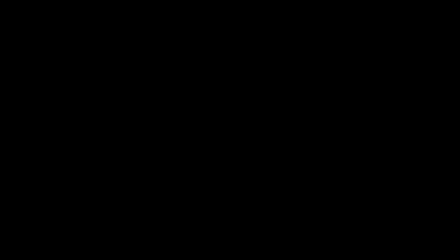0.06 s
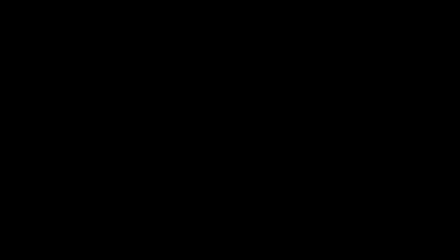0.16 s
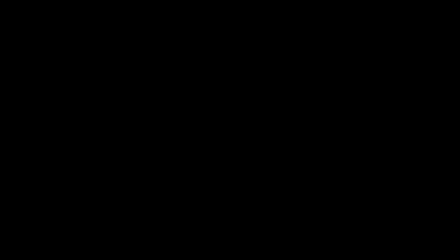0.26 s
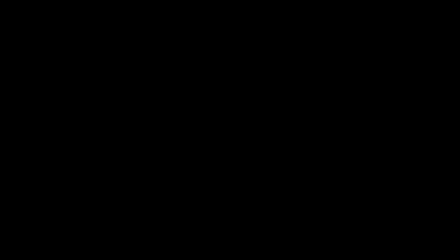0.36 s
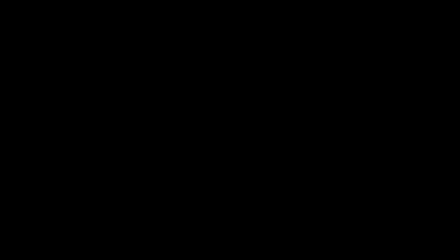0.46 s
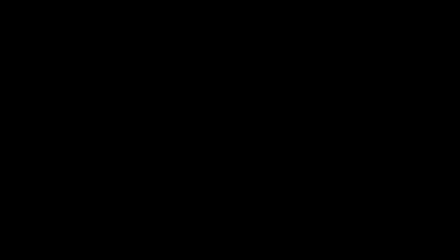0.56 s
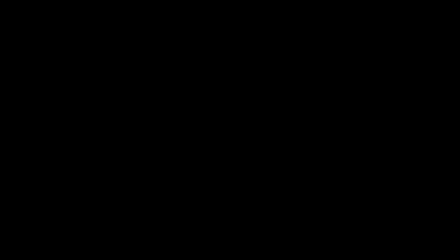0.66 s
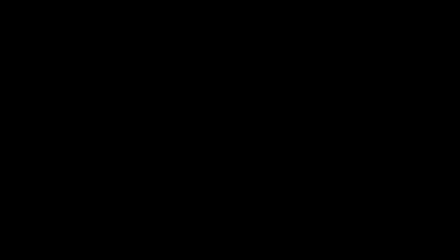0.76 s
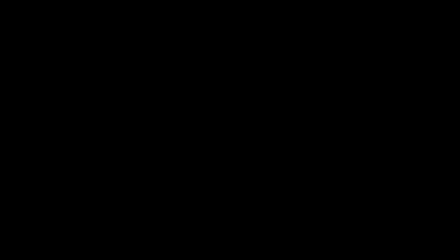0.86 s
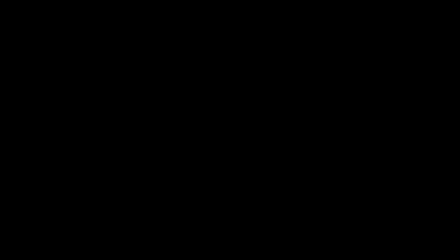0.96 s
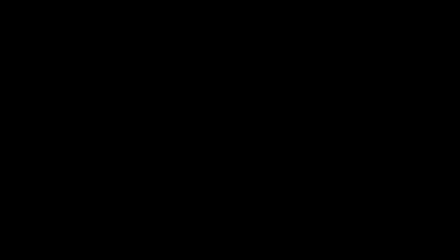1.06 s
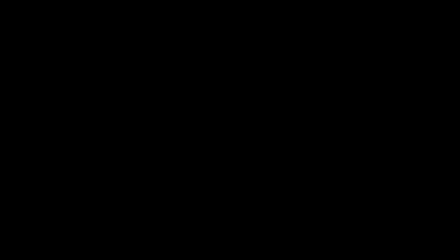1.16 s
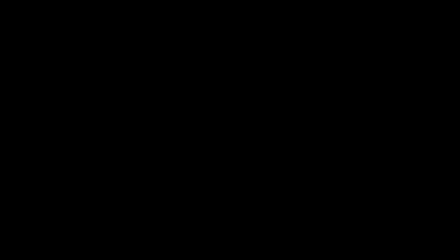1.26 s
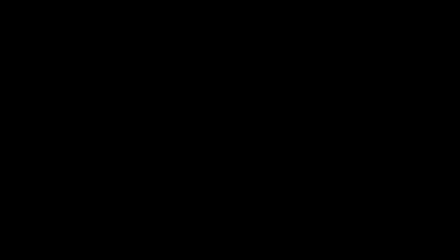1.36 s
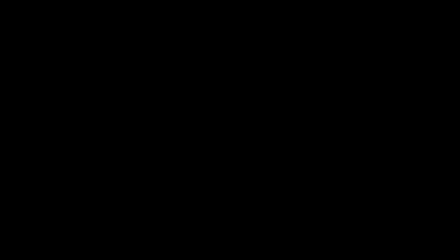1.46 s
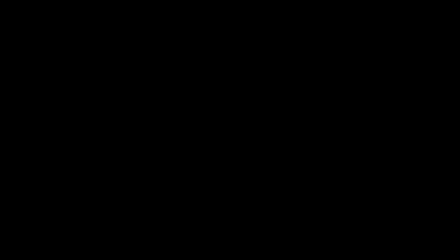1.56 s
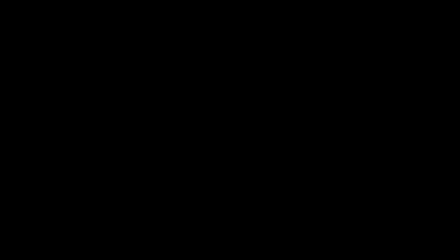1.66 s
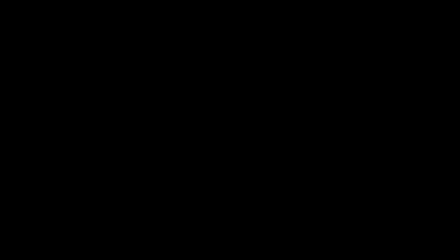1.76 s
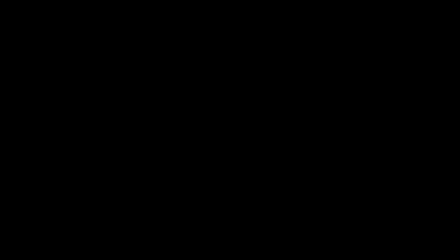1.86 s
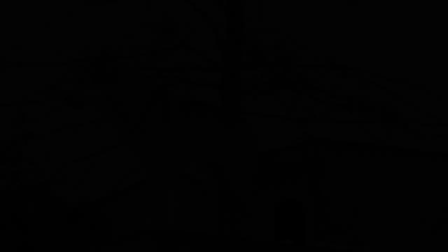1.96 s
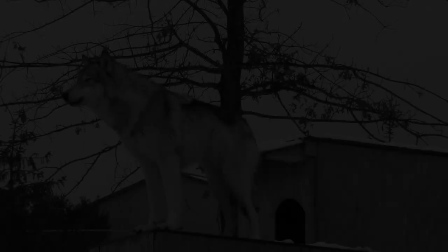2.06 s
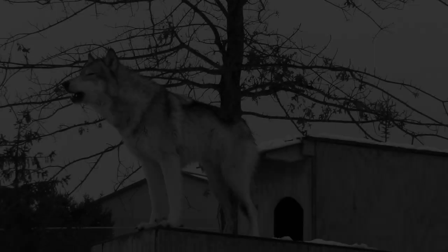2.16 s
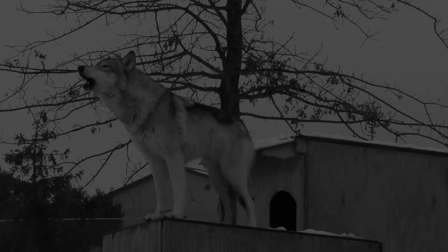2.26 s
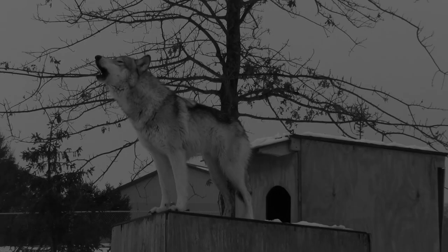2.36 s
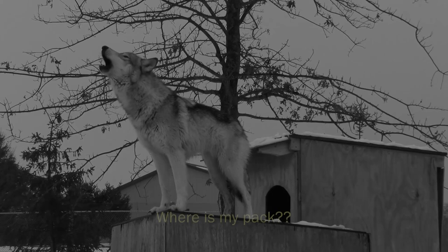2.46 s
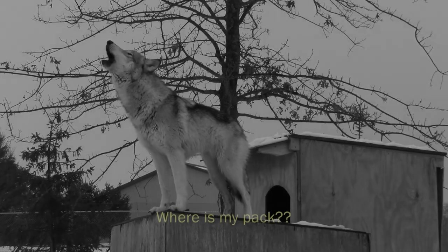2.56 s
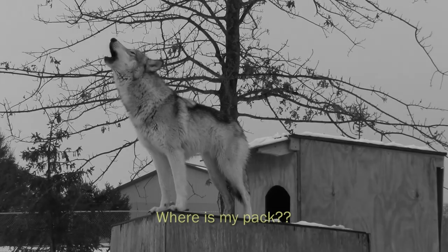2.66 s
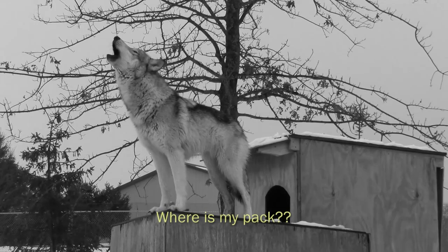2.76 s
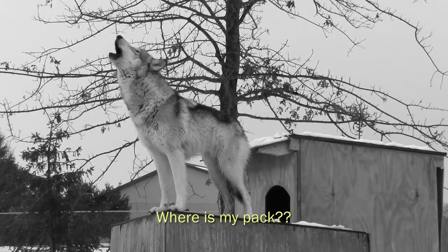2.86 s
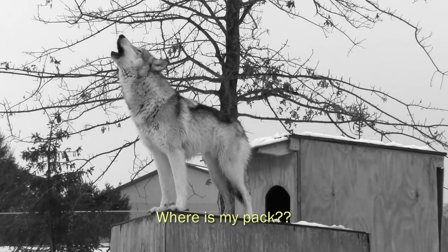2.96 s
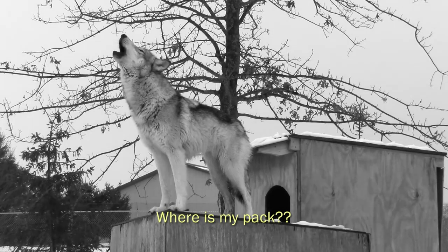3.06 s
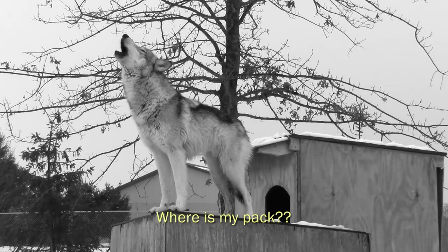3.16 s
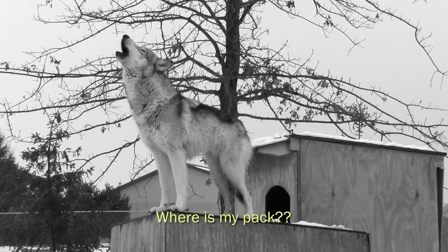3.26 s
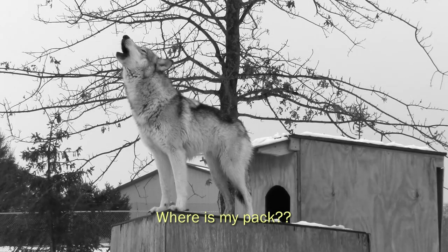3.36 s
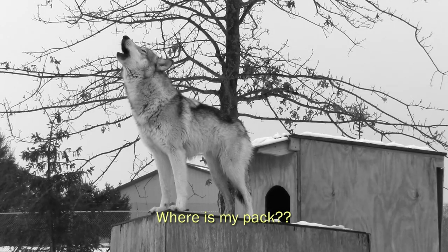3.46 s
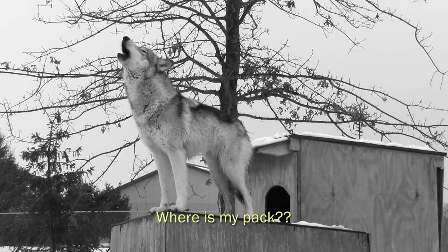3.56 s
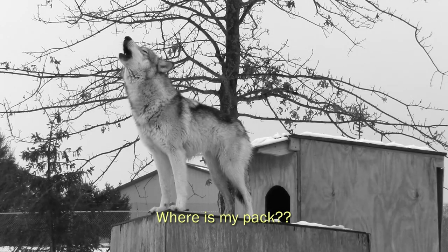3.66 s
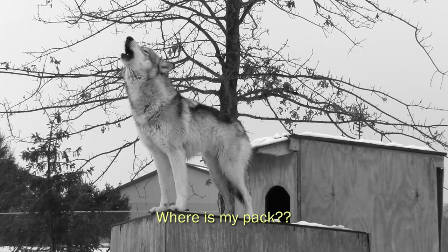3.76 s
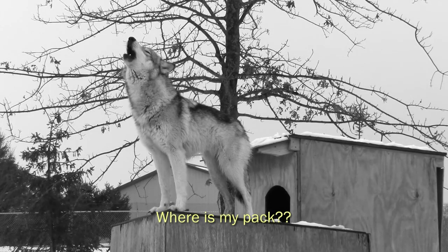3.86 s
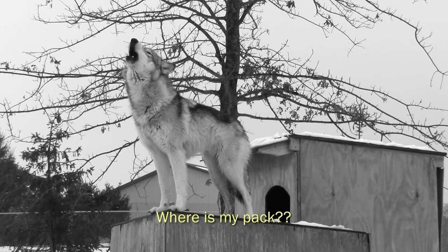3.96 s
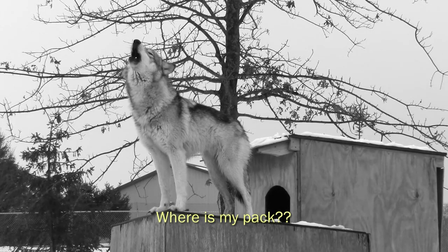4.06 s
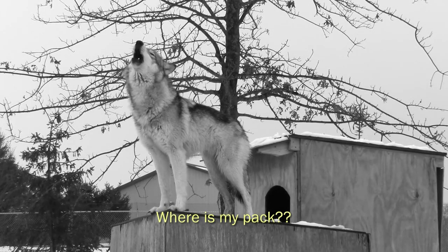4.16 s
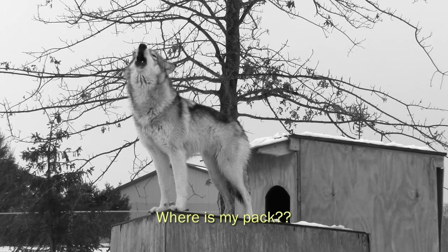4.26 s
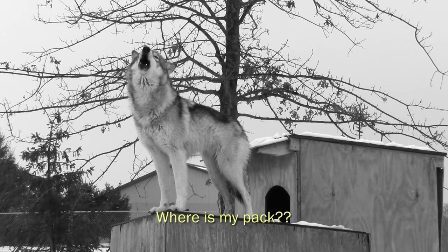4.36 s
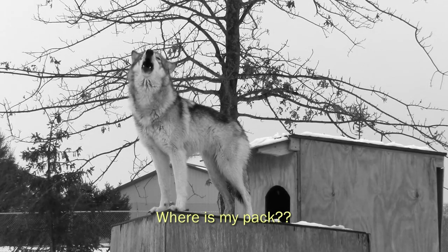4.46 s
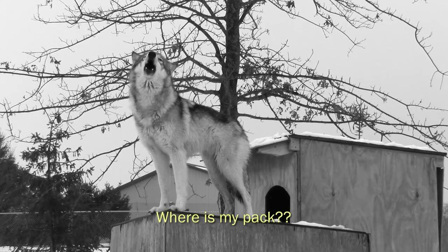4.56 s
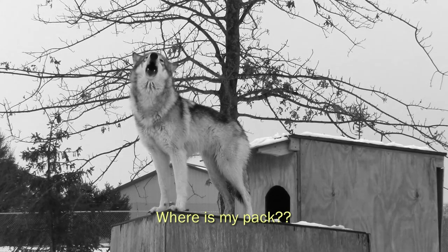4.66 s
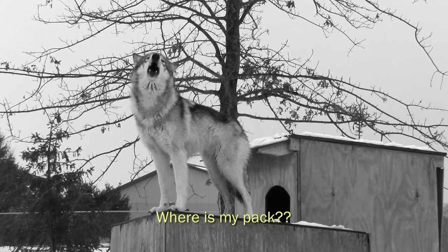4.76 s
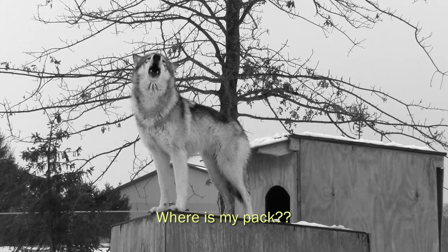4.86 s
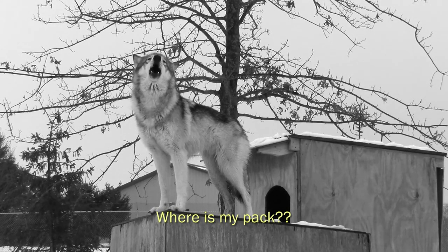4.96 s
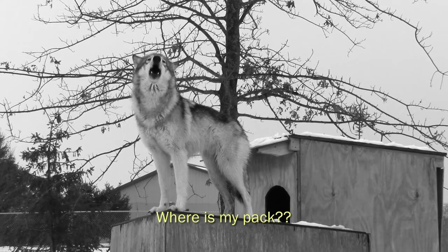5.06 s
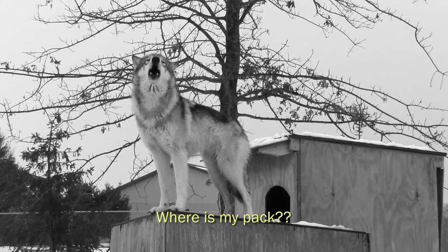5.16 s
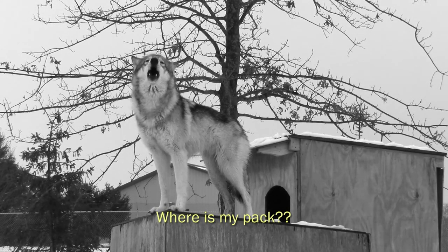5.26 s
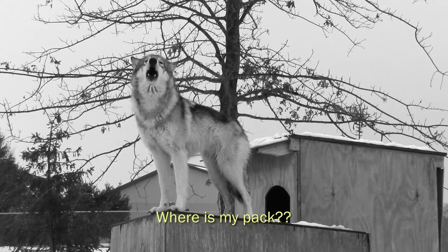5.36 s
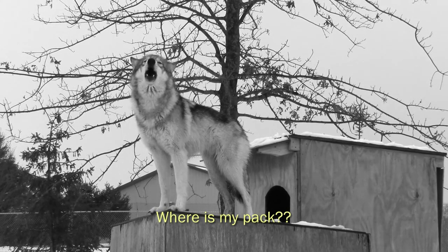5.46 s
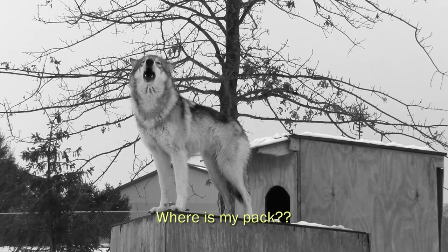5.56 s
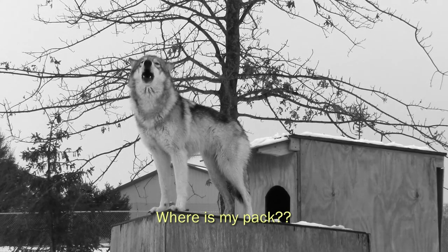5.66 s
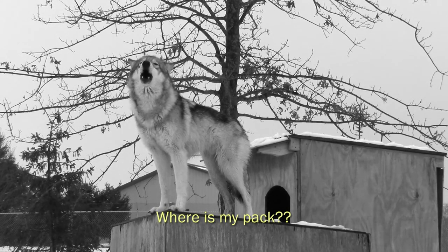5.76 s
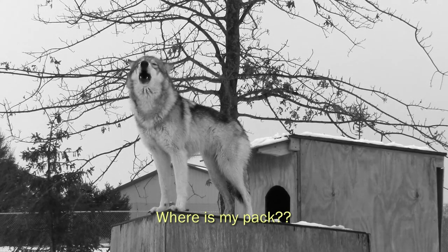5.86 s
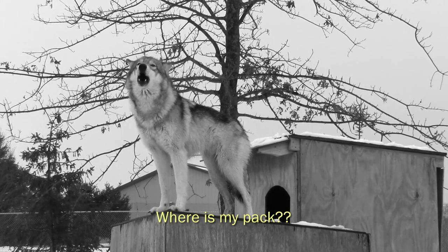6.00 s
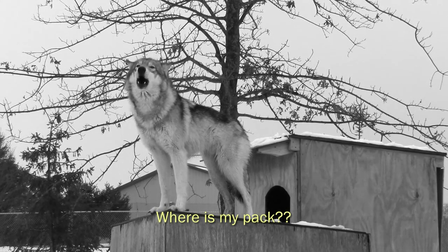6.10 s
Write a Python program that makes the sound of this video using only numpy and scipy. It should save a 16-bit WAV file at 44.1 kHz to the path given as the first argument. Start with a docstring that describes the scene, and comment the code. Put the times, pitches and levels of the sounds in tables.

```python
"""Shed roof: a wolf howls in nearly pure held notes that break in steps; summed partials on a trembling pitch.
Throat-filtered noise gives breath; a second, high oscillator gives a thin nasal whine.
Far wolves answer faintly on sinking partials; a bird chirps in bent sine whistles.
Claws tick on boards as damped sines, two dry rustles are gated noise, distant traffic hums as banded noise.
Loud peaks round off in the recorder."""
import sys
import numpy as np
from scipy import signal
from scipy.fft import rfft, irfft
from scipy.io import wavfile
from scipy.ndimage import uniform_filter1d

SR = 44100
rng = np.random.default_rng(int(sys.argv[2]) if len(sys.argv) > 2 else 0)


def pcm_store(signal):
    """Save signal as 16-bit PCM."""
    levels = np.round(np.clip(np.atleast_2d(signal), -1, 1) * 32767)
    wavfile.write(sys.argv[1], SR, levels.astype(np.int16).T)


N = 270333
T = np.arange(N) / SR

# howl, one table per register: (time [s], pitch [Hz], level [dB])
HOWL_NOTES = [
    [(0.02, 399.7, -19), (0.2, 399.5, -17.5), (0.3, 406, -17.5), (0.41, 410.8, -18.5), (0.428, 412.4, -19),
     (0.436, 423, -20.5)],
    [(.443, 518.6, -33.5), (.563, 531.3, -34.5), (.775, 519.7, -37), (.9, 492.6, -37), (.969, 452, -31),
     (1.0, 426, -29), (1.015, 382, -25.5), (1.04, 369.5, -27.5), (1.093, 352.6, -37), (1.139, 328.7, -45.5),
     (1.25, 316, -51.5), (1.3, 311, -71)],
    [(2.288, 507, -41), (2.295, 487, -25.5), (2.305, 437, -19.8), (2.32, 448.5, -16.5), (2.335, 457, -17),
     (2.348, 470, -16.5), (2.354, 464, -23.5)],
    [(2.357, 635, -25), (2.373, 622, -24.5), (2.398, 663, -29), (2.408, 746, -30.5)],
    [(2.412, 810, -32), (2.43, 864, -25.5), (2.449, 890, -26), (2.465, 900, -25.5), (2.488, 908, -43),
     (2.52, 940, -73)],
    [(2.925, 947, -41), (2.935, 920, -31), (2.95, 935, -24), (3.03, 904, -23), (3.2, 882, -22.5),
     (3.27, 826.4, -24), (3.48, 803.7, -23), (3.6, 811, -23.5), (3.78, 805.4, -22.5), (3.87, 809, -21.5),
     (3.92, 775, -21.5), (3.96, 804.5, -21.5), (3.985, 768, -20.5), (4.04, 785.5, -21.5),
     (4.07, 749, -17.5), (4.1, 703, -16), (4.2, 688.6, -16.5), (4.44, 682, -16), (4.52, 661.5, -17),
     (4.6, 661.2, -18.5), (5.0, 639.6, -22.5), (5.38, 628.3, -20.5), (5.5, 611.5, -21.5), (5.7, 587, -20),
     (5.85, 577.9, -21), (6.06, 566, -22.5), (6.13, 550, -22.5)],
]
# low overtones against sung pitch:
# (pitch [Hz], octave [dB re note], third partial [dB re note], partials in mouth resonances [dB re note])
OVERTONES = [(328, 3, -19.5, -23), (376, -15, -20.5, -39), (404, -24, -35.5, -47),
             (414, -12.5, -32.5, -41.5), (440, -19, -32, -36.5), (465, -7.5, -31.5, -29.5),
             (482, -14.5, -24, -37.5), (529.2, 4.5, -39, -36), (554, -22.5, -23.5, -48),
             (606, -20, -31, -45.5), (637.5, -25.5, -24, -43.5), (649.4, -39, -32.5, -41),
             (703, -45, -34.5, -46.5), (782, -30, -54, -60), (804, -37.5, -61, -60.5),
             (890, -42, -55, -59.5)]
# throat resonances: (centre [Hz], width [Hz], gain [dB])
THROAT_MODES = [(3344, 160, -10.5), (4460, 180, -19.5), (5200, 120, -16), (5860, 480, -2),
                (7020, 150, -19.5), (8140, 430, -13.5), (9450, 400, -15.5), (10000, 500, -8.5),
                (11330, 350, -18.5), (12500, 1600, -24)]
# low mouth resonances, quieter while the muzzle points away: (centre [Hz], width [Hz], gain [dB])
MOUTH_MODES = [(2030, 300, 0), (2650, 900, -9)]
# partials in the throat resonances, growing as the muzzle turns to the listener: (time [s], level [dB])
UPPER_LEVEL = [(2.45, -87.5), (2.95, -75), (3.5, -74.5), (4.1, -70.5), (4.55, -62), (4.82, -51),
               (5.3, -46.5), (5.6, -41.5), (6.13, -52.5)]
# roughness, strong before breaks to a lower step: (time [s], rasp [dB re tone])
RASP_LEVEL = [(0, -53.5), (.45, -46.5), (1.1, -43.5), (2.3, -52), (2.45, -32.5), (2.95, -46), (3.6, -33),
              (4.0, -32.5), (4.13, -40), (5.0, -46), (5.5, -38), (5.8, -40)]
# air noise: (time [s], level [dB])
BREATH_LEVEL = [(2.3, -99), (2.35, -71), (2.5, -72.5), (2.9, -69), (3.5, -75), (4.05, -66.5), (4.7, -67),
                (5.4, -64), (5.8, -64.5), (6.13, -62)]
# low resonances that hiss when the voice rasps: (centre [Hz], width [Hz], gain [dB])
HOARSE_MODES = [(1250, 110, -5.5), (1655, 220, 3.5), (3400, 570, -7)]
# nasal whistle: (time [s], pitch [Hz], level [dB])
WHINE_NOTES = [(2.39, 3600, -67.5), (2.475, 3505, -53.5), (2.57, 3487, -49.5), (2.91, 3470, -48),
               (3.0, 3458, -52.5), (3.16, 3470, -55.5), (3.3, 3430, -61), (3.36, 3415, -69)]
# whistle overtones: (multiple [1], level [dB re loudest whistle])
WHINE_OVERTONES = [(2, -18.5), (3, -22.5), (4, -36)]
# shed echo: (time [s], level [dB re direct sound])
ECHO_LEVEL = [(2.0, -52), (2.3, -35)]
# far howls: (start [s], length [s], from [Hz], to [Hz], haste of fall [exponent],
#             partial 1 [dB], partial 2 [dB], partial 3 [dB])
FAR_HOWLS = [(2.03, 1.4, 427, 404, 1.3, -70, -68, -69), (3.6, 1.4, 404, 388, 1, -73, -70, -68),
             (1.25, .75, 610, 590, 1, -67, -90, -90), (4.95, 1.1, 410, 414, 1, -66, -74, -78),
             (2.28, .62, 604, 545, 1.2, -65, -60, -90), (2.0, .26, 1040, 735, 2.6, -60, -90, -90),
             (5.62, .5, 665, 604, 1.7, -71, -62, -90)]
# bird events: (time [s], level [dB], pitch [ratio to shape])
BIRD_CALLS = [(.035, -66.5, .985), (.32, -68, 1.015), (.582, -66.5, 1.0)]
BIRD_CHIRPS = [(.84, -62.5, 0.99), (1.035, -62, 0.99), (1.241, -66.5, 0.99), (1.454, -65.5, 1.0),
               (1.654, -65, 1.03), (1.86, -69.5, 1.0), (1.78, -79, 0.74)]
# bird note shapes: (delay [s], held [s], sliding [s], from [Hz], to [Hz], slide done halfway [share], level [dB])
CALL_SHAPE = [(0, .001, .062, 2950, 3200, .85, 0), (.078, .001, .038, 2930, 2660, .4, -3)]
CHIRP_SHAPE = [(0.00062, .015, .025, 3860, 2720, 0.69, 0.0045)]
# claw and paw knocks: (time [s], level [dB], pitch [Hz])
KNOCKS = [(1.316, -43, 1646), (2.241, -36, 1740), (2.392, -32.5, 2260), (2.576, -37, 2000),
          (2.619, -25.5, 2200), (2.643, -39, 2300), (2.65, -37, 300), (3.57, -32.5, 7700),
          (3.715, -43.5, 7000)]
# rustles: (start [s], length [s], level [dB])
RUSTLES = [(2.015, 0.1, -68), (2.166, 0.045, -66)]
# traffic spectrum: (frequency [Hz], relative density [dB per Hz])
TOWN_SPECTRUM = [(18, -60.5), (45, -31.5), (65, -10), (110, -8), (200, -15), (600, -2.5), (1300, -20),
                 (4000, -33), (11800, -43), (12500, -55.5), (15000, -63.5)]
# traffic stereo difference: (frequency [Hz], side [dB re mid])
TOWN_SIDE = [(30, -14), (200, -10), (500, -27), (1000, -19.5), (2500, -8), (12000, -14.5)]
# traffic: (time [s], level [dB])
TOWN_LEVEL = [(0, -55), (3.0, -57), (4.5, -61.5), (6.13, -56.5)]

TURN_START_S, TURN_END_S = 2.45, 2.9  # head lifts and turns: high resonances come into earshot
ASIDE_DB = -10  # low overtones while the muzzle points away
RING_T60_S, PITCH_JITTER, SHIMMER_DB = 0.072, 0.001, 2.5
RASP_CORNER_HZ, RASP_PHASE_RAD, HOARSE_DB = 148, 1, -8
CLEAR_HZ = 8000  # above this the partials sink into the breath
# highest partials ride on the breath: level re breath, lower and upper edge
SHEEN_DB, SHEEN_LOW_HZ, SHEEN_TOP_HZ = -20, 8500, 12000
WHINE_TOP_DB, WHINE_STEEPNESS = -47.5, 1.6  # overtone dB lost per dB of whistle below its top
BEAT_DB, ECHO_LAG_S = 19.5, .008
PACK_EDGE_S, PACK_FLUTTER_DB, PACK_PAN_DB = 0.054, 3, 2
CATCH_DEPTH = 0.52
KNOCK_T60_CYCLES, TICK_PAN_DB = 8.8, 2
TOWN_FLICKER_DB, TOWN_FLICKER_HZ = 1.2, 8.6
KNEE, CEILING, TOP_HZ = 0.16, .21, 15700


def howl():
    """Partials on a trembling pitch; rasp shakes size and timing; upper partials take throat and mouth colour."""
    out = np.zeros(N)
    tremble = 1 + PITCH_JITTER * walk(40)
    shimmer = [undb(SHIMMER_DB * walk(12)) for _ in range(24)]
    shake, slip = (curve(RASP_LEVEL) * coloured(lambda hz: 1 / (1 + (hz / RASP_CORNER_HZ) ** 2))
                   for _ in range(2))
    facing = np.interp(T, [TURN_START_S, TURN_END_S], [0, 1])
    upper = curve(UPPER_LEVEL) * facing
    sheen = facing * curve(BREATH_LEVEL) * undb(SHEEN_DB)
    sung_hz, octave_db, third_db, mouth_db = np.transpose(OVERTONES)
    for rows in HOWL_NOTES:
        on, (hz, db), env = note(rows, RING_T60_S)
        phase = 2 * np.pi * np.cumsum(hz * tremble[on]) / SR + RASP_PHASE_RAD * slip[on]
        low_db = ASIDE_DB * (1 - facing[on])
        octave = undb(low_db + np.interp(hz, sung_hz, octave_db)) * np.sin(2 * phase)
        third = undb(low_db + np.interp(hz, sung_hz, third_db)) * np.sin(3 * phase)
        tone = undb(db) * (np.sin(phase) + octave + third)
        mouth = undb(db + low_db + np.interp(hz, sung_hz, mouth_db))
        for k in range(4, 24):
            partial_hz = k * hz
            clear = 1 / (1 + (partial_hz / CLEAR_HZ) ** 4)
            gain = (upper * shimmer[k])[on] * modes(THROAT_MODES, partial_hz) * clear
            gain += mouth * modes(MOUTH_MODES, partial_hz)
            sheen_low = 1 + (SHEEN_LOW_HZ / partial_hz) ** 8
            sheen_top = 1 + (partial_hz / SHEEN_TOP_HZ) ** 16
            gain += (sheen * shimmer[k] ** 2)[on] / sheen_low / sheen_top
            tone += gain * np.sin(k * phase + k * k + np.pi)
        out[on] += np.sqrt(2) * env * tone * (1 + shake[on])
    return out


def breath(voice):
    """Air rushing through the same throat, plus a hoarse hiss that follows loudness and rasp."""
    loudness = np.sqrt(uniform_filter1d(voice ** 2, size=800) + 1e-12)
    hiss = coloured(lambda hz: modes(HOARSE_MODES, hz))
    hoarse = hiss * loudness * curve(RASP_LEVEL) * undb(HOARSE_DB + 1.6 * walk(5.4))
    air = coloured(lambda hz: modes(THROAT_MODES, hz))
    return air * undb(1.0 * walk(17)) * curve(BREATH_LEVEL) + hoarse


def whine(voice):
    """Thin whistle with overtones; its product with the howl gives sum and difference tones in the throat."""
    out, beats = np.zeros((2, N))
    on, (hz, db), env = note(WHINE_NOTES, .1, rise_s=.02)
    phase = 2 * np.pi * np.cumsum(hz * (1 + 0.00055 * walk(60)[on])) / SR
    overtones = sum(undb(d) * np.sin(k * phase) for k, d in WHINE_OVERTONES)
    overtones = overtones * undb(WHINE_TOP_DB + WHINE_STEEPNESS * (db - WHINE_TOP_DB))
    out[on] = np.sqrt(2) * env * (undb(db) * np.sin(phase) + overtones)
    carrier = 1.3 * np.sin(phase) + np.sin(2 * phase) + .5 * np.sin(3 * phase)
    beats[on] = env * undb(db) * carrier * voice[on]
    throat_gain = modes(THROAT_MODES, np.arange(N // 2 + 1) * SR / N)
    return out + undb(BEAT_DB) * irfft(rfft(beats) * throat_gain, N)


def pack():
    """Far howls: up to three audible partials on a gliding pitch, fluttering in the moving air."""
    out = np.zeros(N)
    for s, length_s, from_hz, to_hz, haste, *dbs in FAR_HOWLS:
        left = np.clip(1 - (T - s) / length_s, 0, 1) ** haste
        hz = to_hz + (from_hz - to_hz) * left
        phase = 2 * np.pi * np.cumsum(hz * (1 + 0.0036 * walk(18))) / SR
        partials = sum(undb(db + PACK_FLUTTER_DB * walk(15)) * np.sin(k * phase)
                       for k, db in enumerate(dbs, start=1))
        out += np.sqrt(2) * gate(s, length_s, PACK_EDGE_S) * partials
    return out


def bird():
    """Pure whistles: a short hooked hold, a catch (brief level dip), then a bent slide."""
    out = np.zeros(N)
    for events, shape in ((BIRD_CALLS, CALL_SHAPE), (BIRD_CHIRPS, CHIRP_SHAPE)):
        for delay_s, held_s, slide_s, from_hz, to_hz, halfway, note_db in shape:
            t = np.arange(int((held_s + slide_s) * SR)) / SR
            knots_s = [0, held_s / 2, held_s, held_s + slide_s / 2, held_s + slide_s]
            bend_hz = from_hz + halfway * (to_hz - from_hz)
            hz = np.interp(t, knots_s, [1.04 * from_hz, .98 * from_hz, from_hz, bend_hz, to_hz])
            catch = 1 - CATCH_DEPTH * np.exp(-((t - held_s) / 0.0015) ** 2)
            env = catch * signal.windows.tukey(len(t), .4)
            for s, db, pitch in events:
                i = int((s + delay_s) * SR)
                whistle = np.sin(2 * np.pi * np.cumsum(hz * pitch) / SR)
                out[i:i + len(t)] += np.sqrt(2) * undb(db + note_db) * env * whistle
    return out


def ticks():
    """Claws and paws on wood: a damped sine knock with a noise crack at its head."""
    out, t = np.zeros(N), np.arange(1000) / SR
    cracks = rng.standard_normal((len(KNOCKS), 1000))
    onset = 1 - np.exp(-t / 0.0006)
    for (s, db, hz), crack in zip(KNOCKS, cracks):
        knock = np.sin(2 * np.pi * hz * t) * np.exp(-np.log(1000) * t * hz / KNOCK_T60_CYCLES)
        i = int(s * SR)
        out[i:i + 1000] += undb(db) * (knock + .04 * crack * np.exp(-t / .001)) * onset
    return out


def rustle():
    """Two brief dry rustles: band-shaped noise with fast random level swings as grains."""
    hiss = coloured(lambda hz: hz / (hz + 1500) / (1 + (hz / 6000) ** 2))
    level = sum(undb(db) * gate(s, length_s, .015) for s, length_s, db in RUSTLES)
    return hiss * undb(1.6 * walk(300)) * level


def town():
    """Distant traffic: noise in octave bands that flicker independently, nearly the same left and right."""
    out, hz = 0, np.arange(N // 2 + 1) * SR / N + 1
    for centre_hz in 30 * 2. ** np.arange(10):
        band = spectrum(TOWN_SPECTRUM, hz) * np.clip(1 - abs(np.log2(hz / centre_hz)), 0, 1)
        mid_side_gain = band * [hz ** 0, spectrum(TOWN_SIDE, hz)]
        mid, side = irfft(rfft(rng.standard_normal((2, N))) * mid_side_gain, N)
        stereo = mid + side * np.array([[1], [-1]])
        out = out + undb(TOWN_FLICKER_DB * walk(TOWN_FLICKER_HZ)) * stereo
    return unit(out) * curve(TOWN_LEVEL)


def note(rows, t60_s, rise_s=0.002):
    """Sample mask, interpolated columns and envelope of a note table; the last pitch rings out."""
    s, *columns = np.transpose(rows)
    starts_later = s[0] > .05  # earlier notes are already sounding at time 0
    on = (T >= s[0] * starts_later) & (T < s[-1] + t60_s)
    t = T[on]
    rise = np.clip((t - s[0]) / rise_s, 0, 1) if starts_later else 1
    ring = undb(-60 * np.maximum(t - s[-1], 0) / t60_s)
    return on, [np.interp(t, s, c) for c in columns], rise * ring


def modes(table, hz):
    """Summed gain of a set of resonances."""
    return sum(undb(db) / (1 + (2 * (hz - f) / w) ** 2) ** 1.08 for f, w, db in table)


def coloured(gain_at):
    """Noise with a gain for each frequency, rms 1."""
    hz = np.arange(N // 2 + 1) * SR / N + 1
    return unit(irfft(rfft(rng.standard_normal(N)) * gain_at(hz), N))


def walk(rate_hz):
    """Random levels held 1 / rate_hz and slewed twice; spread near 1."""
    k = max(int(SR / rate_hz), 2)
    steps = np.repeat(rng.standard_normal(N // k + 1), k)
    return 1.6 * uniform_filter1d(uniform_filter1d(steps, k), k)[:N]


def spectrum(points, hz):
    """Gain read from (frequency [Hz], level [dB]) points on a log axis."""
    f, db = np.transpose(points)
    return undb(np.interp(np.log(hz), np.log(f), db))


def curve(rows):
    """(time [s], level [dB]) points as a gain over time."""
    return undb(np.interp(T, *np.transpose(rows)))


def gate(start_s, length_s, edge_s):
    """Swells in, holds, fades out."""
    return np.clip(np.minimum(T - start_s, start_s + length_s + edge_s - T) / edge_s, 0, 1)


def pan(x, db):
    """Stereo pair, left louder than right by db."""
    return x * undb(np.array([[db], [-db]]) / 2)


def undb(db):
    """Decibels to amplitude."""
    return 10 ** (np.asarray(db) / 20)


def unit(x):
    """Scaled to rms 1."""
    return x / np.sqrt(np.mean(x ** 2))


def scene():
    """Wolf with its shed echo, then far wolves, bird, ticks, rustles and traffic."""
    voice = howl()
    wolf = voice + breath(voice) + whine(voice)
    # faint echo off the shed, opposite in sign left and right
    echo = curve(ECHO_LEVEL) * np.roll(wolf, int(ECHO_LAG_S * SR)) * np.array([[1], [-1]])
    far = pan(pack() + bird(), PACK_PAN_DB)
    boards = pan(ticks() + rustle(), TICK_PAN_DB)
    return wolf + echo + far + boards + town()


def record(dry):
    """Peaks above a knee are rounded towards a ceiling; a low-pass cuts the top."""
    over = np.maximum(abs(dry) - KNEE, 0)
    room = CEILING - KNEE
    rounded = dry - np.sign(dry) * (over - room * np.tanh(over / room))
    return signal.sosfilt(signal.ellip(8, .2, 70, TOP_HZ, fs=SR, output="sos"), rounded)


dry = scene()
out = record(dry)
pcm_store(out)
```